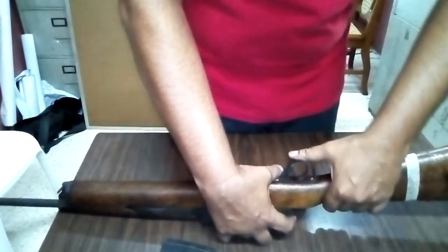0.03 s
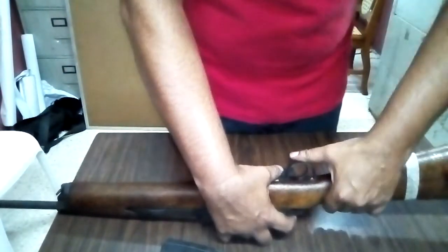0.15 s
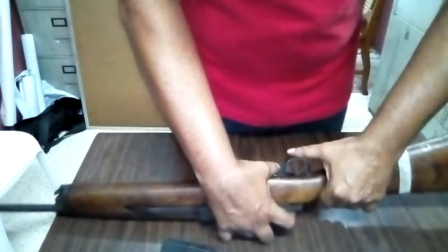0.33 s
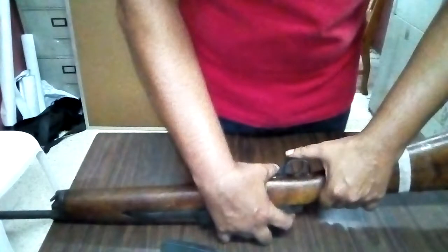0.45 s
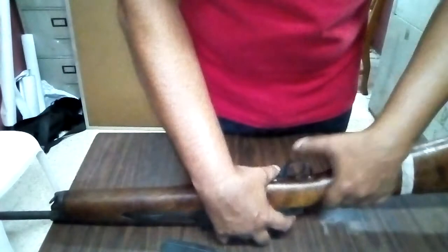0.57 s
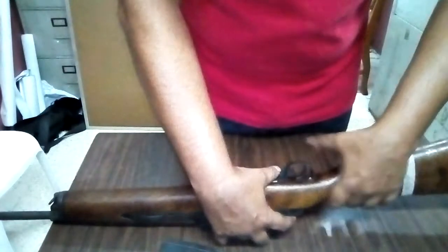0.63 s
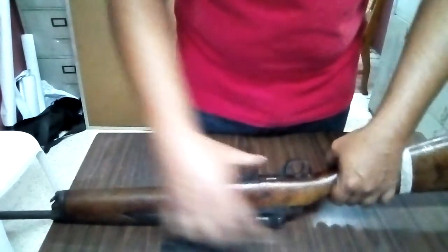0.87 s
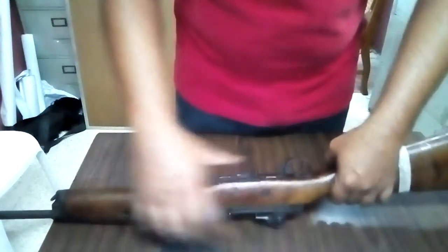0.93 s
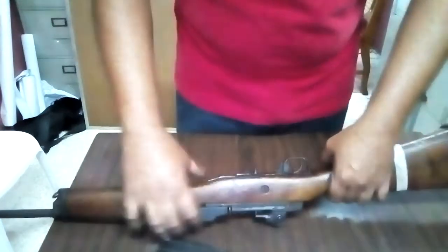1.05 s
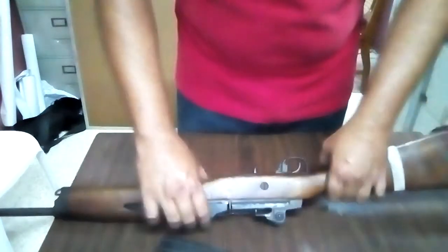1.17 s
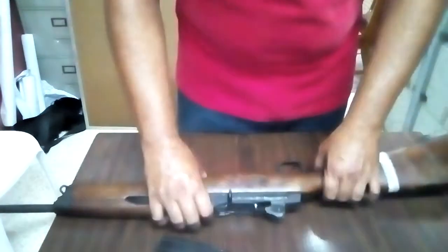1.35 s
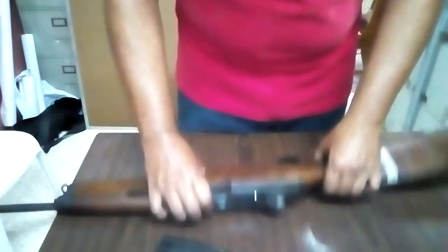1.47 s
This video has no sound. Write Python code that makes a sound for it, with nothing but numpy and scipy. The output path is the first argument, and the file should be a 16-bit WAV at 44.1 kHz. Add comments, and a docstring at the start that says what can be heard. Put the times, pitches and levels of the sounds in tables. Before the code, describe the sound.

In a small room with a short echo, a rifle closes with one sharp metallic snap. Its stock bumps a wooden tabletop, a hand slides faintly over it, and it rolls over with soft knocks and a light click.

```python
"""Rifle closed on a wooden table

In a small hard room the action snaps shut with a sharp steel blow, then the stock thumps on the table.
A hand slides along the rifle, it is rolled over with soft knocks, and a metal part clicks.
Each contact is a noise burst plus decaying modes. The room rings for half a second over faint hum and hiss."""
import sys
import numpy as np
from scipy import signal
from scipy.fft import rfft, irfft, next_fast_len
from scipy.io import wavfile

SR = 44100
rng = np.random.default_rng(int(sys.argv[2]) if len(sys.argv) > 2 else 0)


def to_wav(sig):
    """Store sig (one row per channel, or 1-D mono) as 16-bit WAV at the path in sys.argv[1].

    Samples outside -1..1 are clipped; the rate is SR.
    """
    pcm = np.clip(np.atleast_2d(sig), -1, 1) * 32767
    pcm = np.round(pcm).astype(np.int16)
    wavfile.write(sys.argv[1], SR, pcm.T)  # frames by channels


N = 66150


def amp(db):
    """Decibels to gain."""
    return 10 ** (np.asarray(db) / 20)


def fade(t, t60_s):
    """Exponential decay, 60 dB in t60_s."""
    return np.exp(-np.log(1000) * t / t60_s)


def along(points, hz):
    """Interpolate (f/Hz, value) points on a log frequency axis."""
    points_hz, values = np.transpose(points)
    return np.interp(np.log(hz + 1), np.log(points_hz + 1), values)


def colour(spectrum):
    """Gain per frequency bin, scaled to rms 1."""
    gain = amp(along(spectrum, np.fft.rfftfreq(N, 1 / SR)))
    return gain / np.sqrt(np.mean(gain ** 2) + 1e-20)


def noise(spectrum):
    """Coloured noise of rms 1."""
    return irfft(rfft(rng.standard_normal(N)) * colour(spectrum), N)


def burst(spectrum, envelope):
    """Enveloped noise, coloured at minimum phase to keep the attack clean."""
    cepstrum = irfft(np.log(colour(spectrum) + 1e-6), N)
    cepstrum[1:N // 2] *= 2
    cepstrum[N // 2 + 1:] = 0
    excitation = envelope * rng.standard_normal(N)
    return irfft(rfft(excitation) * np.exp(rfft(cepstrum)), N)


def ring(modes, t, scatter_db, rise_s):
    """Decaying modes whose levels scatter from strike to strike."""
    tones = np.zeros(N)
    for hz, db, t60_s in modes:
        gain = amp(db + scatter_db * rng.standard_normal())
        tones += gain * fade(t, t60_s) * np.sin(2 * np.pi * hz * t)
    return tones * (1 - np.exp(-t / rise_s))


def softened(rows, cutoff_hz):
    """A soft contact rolls off (f/Hz, level/dB, ...) rows above its cut-off."""
    return [(hz, db - 10 * np.log10(1 + (hz / cutoff_hz) ** 2), *rest) for hz, db, *rest in rows]


def tilted(rows, db_per_oct, corner_hz=1000):
    """Brighten or dull (f/Hz, level/dB, ...) rows above the corner."""
    return [(hz, db + db_per_oct * np.log2(1 + hz / corner_hz), *rest) for hz, db, *rest in rows]


def background(t):
    """Room air, microphone hiss and a faint electrical hum."""
    # air and hiss: f/Hz, relative level/dB
    hiss_spectrum = [(25, -30), (60, -6.5), (85, -23), (120, -7.5), (170, -12), (240, -8), (330, -8.5),
                     (870, -9.5), (1420, -14.5), (1800, -19), (2300, -19.5), (2950, -25.5), (4200, -22),
                     (5200, -26.5), (6400, -23.5), (7600, -32.5), (8200, -38.5), (13800, -39.5),
                     (14600, -28), (15600, -27.5)]
    # hum partials: f/Hz, rms level/dB
    hum_partials = [(59, -82), (118.4, -76), (236.9, -68.5)]
    hum = sum(amp(db) * np.sqrt(2) * np.sin(2 * np.pi * (hz * t + rng.random()))
              for hz, db in hum_partials)
    return amp(-58) * noise(hiss_spectrum) + hum


def room(spectrum, t):
    """Diffuse echo of a contact: noise builds up, then each band dies at its own rate."""
    # reverberation time: f/Hz, t60/s
    decay_times = [(100, 0.46), (500, 0.45), (1100, 0.49), (3700, .45), (6400, 0.46), (9000, 0.4),
                   (15000, 0.29)]
    delay_s, build_s = 0.0014, 0.0076
    hz, frame_s, bands = signal.stft(noise(spectrum), SR, nperseg=512)
    decay = fade(frame_s, along(decay_times, hz)[:, None])
    _, tail = signal.istft(bands * decay, SR, nperseg=512)
    build_up = 1 - np.exp(-np.maximum(t - delay_s, 0) / build_s)
    return tail[:N] * build_up


def hand(t):
    """Skin brushes over the varnish in a brief swell and a longer one."""
    # swells: centre t/s, half-width/s, level/dB
    slides = [(1.052, .006, -59), (1.107, 0.033, -58.5)]
    # skin friction: f/Hz, relative level/dB
    skin_spectrum = [(300, 3), (1200, 5), (2200, -1.5), (3200, -13), (5000, -2), (6400, -2), (8000, -22),
                     (12000, -30)]
    return sum(amp(db) * noise(skin_spectrum) / np.sqrt(1 + ((t - centre_s) / half_width_s) ** 4)
               for centre_s, half_width_s, db in slides)


def stock(t):
    """The wooden stock lands and rocks: each knock pushes the table, thuds, and rings top and room."""
    # wood contacts: t/s, level/dB, contact cut-off/Hz
    knocks = [(0.261, -9, 110), (0.4722, -0.5, 1500), (0.479, 4.5, 2980), (0.487, 3.5, 1510),
              (.511, -4.5, 900), (.528, -6, 710), (.551, -7.5, 700), (1.035, -18, 350),
              (1.0479, -13.5, 500), (1.279, -11.5, 690), (1.295, -16.5, 1500), (1.321, -14.5, 300),
              (1.358, -6.5, 890), (1.3848, -14, 400), (1.401, -10.5, 246)]
    # whole table giving under a blow: f/Hz, level/dB, t60/s
    push_modes = [(67, -10.5, 0.058), (104.8, 0, 0.098)]
    # tabletop ringing: f/Hz, level/dB, t60/s
    top_modes = [(125.5, 1.5, 0.26), (175.6, 0, 0.43), (289.2, 2.5, 0.31), (362.5, -3, 0.34),
                 (415, -7, 0.21), (594, -9, .3), (1075, -8, 0.35)]
    # wood on wood: f/Hz, relative level/dB
    thud_spectrum = [(20, -39), (45, -29), (85, -8.5), (130, 1.5), (180, -2), (235, -7), (290, 1),
                     (470, -5), (600, -7), (1010, -6.5), (1300, -14.5), (4000, -25.5), (8000, -48.5)]
    attack_s = 0.0015
    blow = fade(t, t60_s=0.046) * (1 - fade(t, attack_s))
    out = np.zeros(N)
    for start_s, db, cutoff_hz in knocks:
        wood_spectrum = softened(thud_spectrum, cutoff_hz)
        push = amp(-33.5) * ring(push_modes, t, scatter_db=1, rise_s=0.0033)
        thud = amp(-31) * burst(wood_spectrum, blow)
        top = amp(-42.5) * ring(softened(top_modes, cutoff_hz), t, scatter_db=1.5, rise_s=0.012)
        echo = amp(-38.5) * room(wood_spectrum, t)
        onset = round(start_s * SR)
        out[onset:] += amp(db) * (push + thud + top + echo)[:N - onset]
    return out


def action(t):
    """Each steel contact cracks, rings the action and sets off the room."""
    # steel contacts: t/s, level/dB, treble tilt/(dB/octave)
    clicks = [(.2309, 1, 2), (0.233, 2, -1), (.2384, -5.5, 3.5), (.4718, -26.5, -5.5), (0.4787, -20, -5.5),
              (.4895, -40, 0), (1.4728, -27, -5.5), (1.4775, -27.5, -1.5), (1.4885, -24, -5.5)]
    # action ringing in its stock: f/Hz, level/dB, t60/s
    action_modes = [(231, -6, 0.32), (492.5, -10, .4), (734, -12, 0.1), (793, 9.5, 0.03), (867, 3, 0.56),
                    (1014, -11, 0.32), (1145, -3, 0.62), (1663, 2.5, 0.302), (1874, -10, 0.24),
                    (6172, -20, .45), (6120, -24, .45), (6478, 0, 0.47), (6750, 5, .35)]
    # crack of the steel: f/Hz, relative level/dB
    crack_spectrum = [(40, -47), (120, -44), (230, -10), (330, -25.5), (790, 3.5), (1180, -5), (1400, -4.5),
                      (1880, -12), (2580, -13.5), (3000, -12.5), (3700, -17), (5000, -10.5), (6390, -5),
                      (7400, -14.5), (8900, -34), (13400, -42), (15500, -31)]
    # its colour in the room: f/Hz, relative level/dB
    echo_spectrum = [(40, -45), (140, -19.5), (250, -7), (330, -12.5), (490, -6), (700, -1.5), (1130, 1.5),
                     (1400, -4.5), (1880, -5), (2400, -9.5), (3000, -9.5), (4000, -11.5), (5100, -10.5),
                     (6390, -6), (7300, -16), (9150, -31.5), (13000, -36.5), (15500, -34)]
    attack_s = 0.00035
    strike = fade(t, t60_s=0.021) * (1 - fade(t, attack_s))
    out = np.zeros(N)
    for start_s, db, db_per_oct in clicks:
        crack = amp(-14) * burst(tilted(crack_spectrum, db_per_oct), strike)
        steel = amp(-34) * ring(tilted(action_modes, db_per_oct), t, scatter_db=1.5, rise_s=0.0023)
        echo = amp(-22) * room(tilted(echo_spectrum, db_per_oct), t)
        onset = round(start_s * SR)
        out[onset:] += amp(db) * (crack + steel + echo)[:N - onset]
    return out


def scene():
    """All sources at one microphone."""
    t = np.arange(N) / SR
    return (action(t) + stock(t) + hand(t) + background(t))[None]


def record(dry):
    """The small microphone loses the deepest bass and everything above its band limit."""
    low_cut_hz, band_limit_hz = 19, 15620
    low_cut = signal.butter(2, low_cut_hz, "highpass", fs=SR, output="sos")
    thinned = signal.sosfilt(low_cut, dry)
    n_fft = next_fast_len(N + SR // 2)
    passband = np.fft.rfftfreq(n_fft, 1 / SR) < band_limit_hz
    return irfft(rfft(thinned, n_fft) * passband, n_fft)[:, :N]


dry = scene()
out = record(dry)
to_wav(out)
```